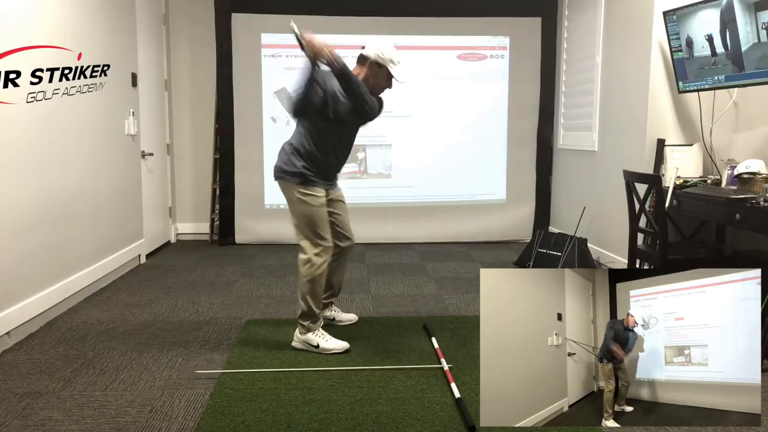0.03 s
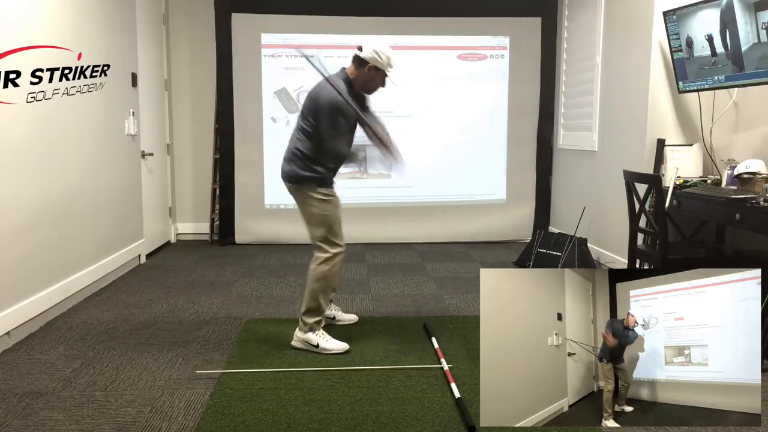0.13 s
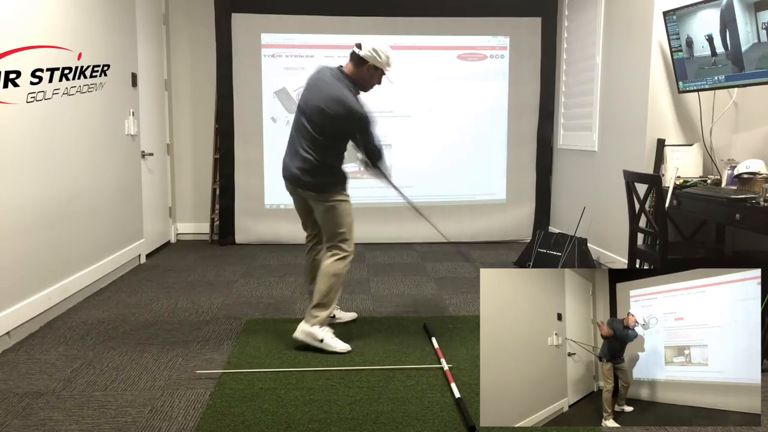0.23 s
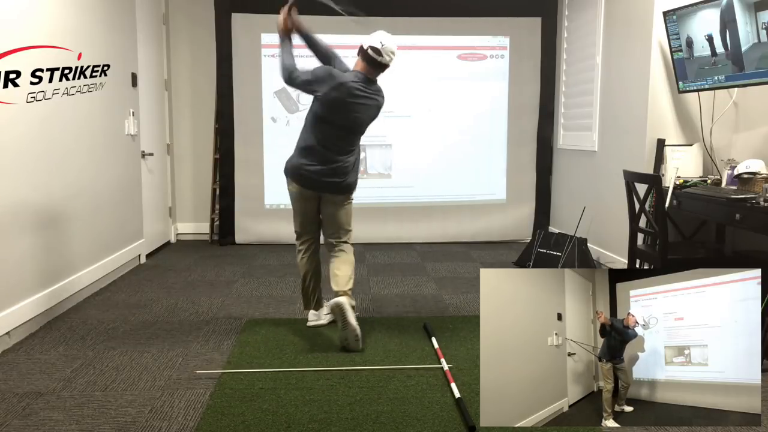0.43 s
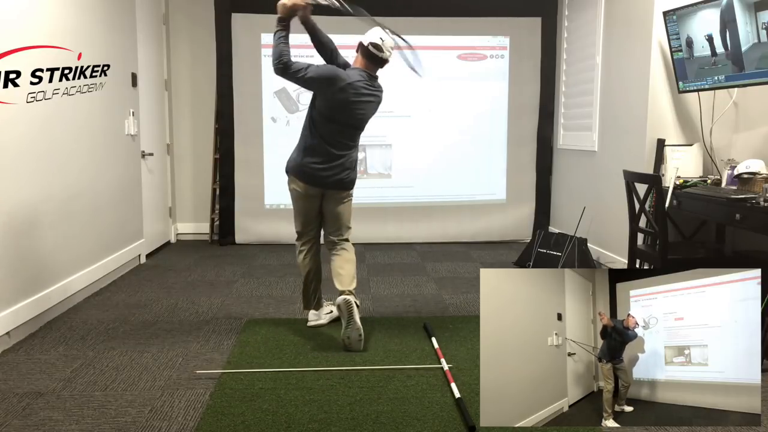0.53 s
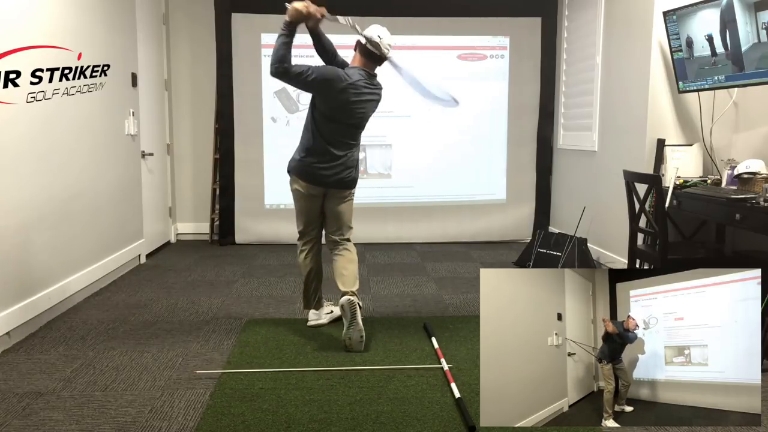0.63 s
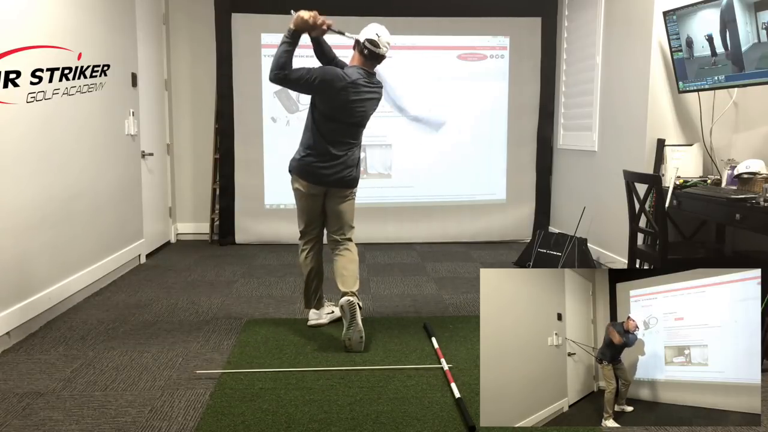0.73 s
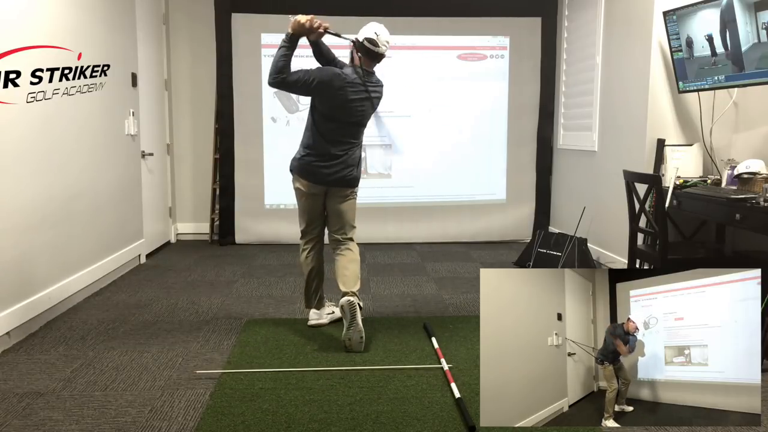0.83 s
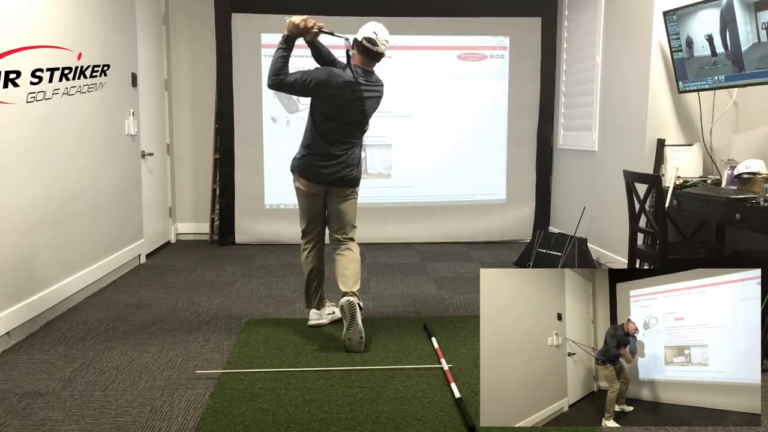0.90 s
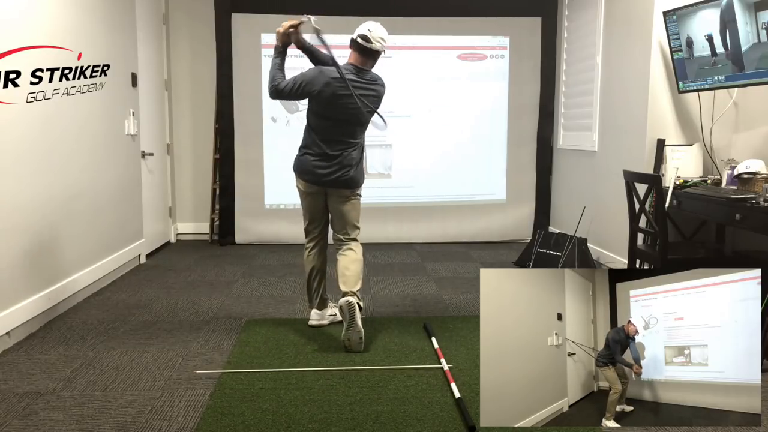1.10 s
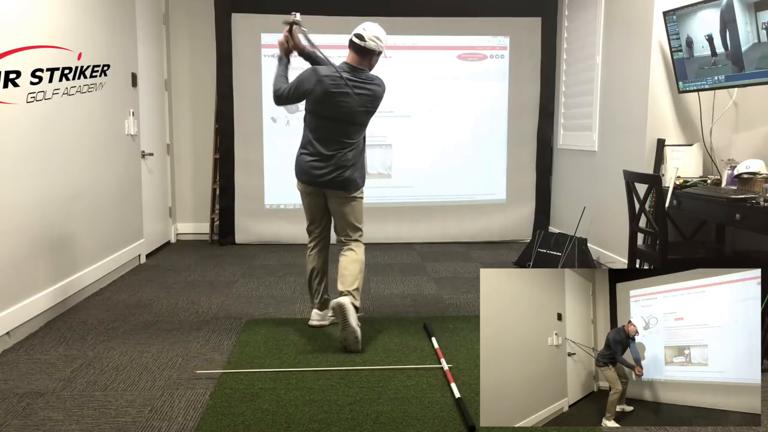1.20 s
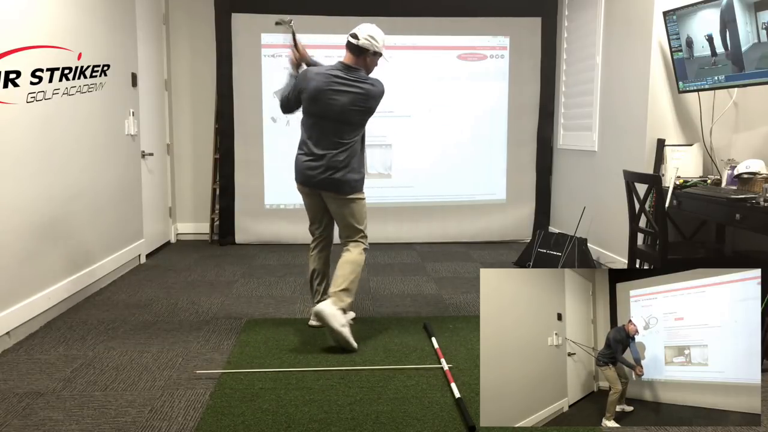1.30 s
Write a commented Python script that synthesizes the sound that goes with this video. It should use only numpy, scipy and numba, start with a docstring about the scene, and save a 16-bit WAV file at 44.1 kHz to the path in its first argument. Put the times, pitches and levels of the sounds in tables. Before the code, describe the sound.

After a small low thud and tick, one swift hollow whoosh of a swung rubber band swells, hits a distorted thump and drops away, leaving a short room ring, soft clothing rustle and light clicks in a garage.

```python
"""Rubber band swung in a garage

One full swing of a rubber band on a grip. Vortices shed off the band sing a tone that rises and falls with
its speed, with an octave and a hiss of turbulence; low thuds sound too, and one in mid-swing overloads the
microphone. Hard walls answer the swing, the thuds and small ticks with decaying diffuse noise. Grains of
cloth rustle, room tone and a low rumble lie beneath."""
import sys
import numpy as np
from scipy import signal
from scipy.fft import rfft, irfft, next_fast_len
from scipy.io import wavfile
from scipy.ndimage import uniform_filter1d
from numba import njit

SR = 44100
rng = np.random.default_rng(int(sys.argv[2]) if len(sys.argv) > 2 else 0)


def dump_mix(stems):
    """Bounce the given channels to the path in sys.argv[1] as a 16-bit WAV at rate SR."""
    frames = np.atleast_2d(stems).T  # one column per channel
    limited = np.clip(frames, -1, 1)  # hard clip at full scale
    pcm = np.round(limited * 32767).astype(np.int16)
    wavfile.write(sys.argv[1], SR, pcm)


N = 59535
T = np.arange(N) / SR  # time of each sample, s


def undb(db):
    """Amplitude ratio: 20 dB is a factor of ten."""
    return 10 ** (np.asarray(db) / 20)


def unit(x):
    """Normalisation to an rms of 1."""
    return x / np.sqrt(np.mean(x ** 2))


def curve(rows, axis):
    """Linear interpolation: one column of a time table, per sample."""
    rows = np.array(rows)
    return np.interp(T, rows[:, 0], rows[:, axis])


def colour(x, points):
    """Spectral shaping: weight x by a (Hz, dB) spectrum; rms 1."""
    hz, db = np.array(points).T
    f = np.maximum(np.fft.rfftfreq(len(x), 1 / SR), 1)
    gain_db = np.interp(np.log(f), np.log(hz), db)
    gain_db -= 20 * np.maximum(np.log2(hz[0] / f), 0)  # 20 dB per octave below the first point
    return unit(irfft(rfft(x) * undb(gain_db), len(x)))


def walk(rate):
    """Slow random modulation: noise averaged twice over 1 / rate seconds; rms 1."""
    width = max(int(SR / rate), 1)
    once = uniform_filter1d(rng.standard_normal(N), width)
    return unit(uniform_filter1d(once, width))


@njit
def svf(x, hz, share):
    """Resonance: a state-variable band-pass with a moving centre; share sets its width over its centre."""
    y, b, l = np.empty(len(x)), 0., 0.  # b, l: band-pass and low-pass states
    for i in range(len(x)):
        g = np.tan(np.pi * hz[i] / SR)
        v = (b + g * (x[i] - l)) / (1 + g * (g + share))
        b, l, y[i] = 2 * v - b, l + 2 * g * v, share * v
    return y


def whirr(hz, share):
    """Narrow-band noise: two cascaded resonances around a moving centre steepen the skirts; rms 1."""
    hz = np.minimum(hz * np.ones(N), .45 * SR)
    once = svf(rng.standard_normal(N), hz, 1. * share)
    return unit(svf(once, hz, 1. * share))


def band():
    """Aeolian tone: vortices shed at a rate set by the band's speed, with octave, spread and turbulence."""
    # Shedding pitch, following the band's speed. Each row: time in seconds, pitch in Hz.
    pitch = [(.165, 480), (.19, 545), (.207, 650), (.228, 810), (.248, 970), (.27, 900), (.29, 1010),
             (.302, 1110), (.312, 920), (.322, 700), (.335, 520), (.355, 470), (.6, 440)]
    # Swing. Each row: time in seconds, then levels in dB of tone, turbulence and fine treble hiss.
    swing_levels = [(.11, -61, -62, -73), (.165, -55, -54, -51), (.19, -22.5, -43, -54.5),
                    (.207, -11.5, -34, -44.5), (.228, -8, -22, -43.5), (.247, -7, -21, -37.5),
                    (.262, -23.5, -11.5, -32.5), (.285, -17, -11.5, -39), (.302, -15, -27, -39),
                    (.318, -8, -37, -63), (.335, -19.5, -24, -66), (.355, -19, -58.5, -68),
                    (.38, -41, -60, -74), (.43, -54, -27.5, -46), (.48, -60, -40, -66),
                    (.6, -65.5, -67, -71)]
    # Share of the band that sheds out of step. Each row: time in seconds, level in dB against the tone.
    spread_levels = [(.17, -3), (.2, -12), (.24, -6), (.29, -1), (.34, -6)]
    # Turbulence spectrum. Each row: frequency in Hz, relative level in dB per Hz.
    turbulence = [(710, 6.5), (1200, 5), (1570, 7), (1750, -2), (2430, -5.5), (3980, -15), (8600, -21.5),
                  (15500, -60)]
    pitch_wobble, level_wobble_db, wobble_per_s = .05, 4, 150  # rms share of pitch, rms dB, rate
    octave_db, treble_hz = -16, 8500  # octave against the tone; centre of the treble hiss

    hz = curve(pitch, axis=1)
    wavering_hz = hz * (1 + pitch_wobble * walk(wobble_per_s))
    phase = 2 * np.pi * np.cumsum(wavering_hz) / SR
    tone = np.sqrt(2) * undb(level_wobble_db * walk(wobble_per_s)) * np.sin(phase)
    octave = undb(octave_db) * whirr(2 * hz, .35)
    spread = undb(curve(spread_levels, axis=1)) * whirr(hz, .6)
    hiss = colour(rng.standard_normal(N), turbulence) * undb(1.5 * walk(40))
    treble = whirr(treble_hz, 0.73)
    return (undb(curve(swing_levels, axis=1)) * (tone + octave + spread)
            + undb(curve(swing_levels, axis=2)) * hiss
            + undb(curve(swing_levels, axis=3)) * treble)


def thuds():
    """Damped oscillation: each thud is a low sine whose pitch sags as it dies, with noisy grit on it."""
    # Each row: start in seconds, nominal peak in dB, first and last pitch in Hz, seconds to fall 20 dB.
    thud_rows = [(.0028, -25, 520, 150, .02), (.0203, -15, 500, 85, .016), (.2568, 6, 440, 118, .021),
                 (.280, -9, 200, 95, .032), (.55, -36, 160, 70, .03), (.764, -34, 400, 100, .012),
                 (.8853, -29, 560, 150, .007), (.902, -31, 560, 150, .007)]
    sag_s, rise_s = .0022, .002  # time constants of the pitch sag and of the onset
    grit = undb(-9.5) * whirr(362, 0.87)
    out = np.zeros(N)
    for s, db, first_hz, last_hz, fade_s in thud_rows:
        t = np.maximum(T - s, 0)
        turns = last_hz * t + (first_hz - last_hz) * sag_s * (1 - np.exp(-t / sag_s))
        level = undb(db - 20 * (t / fade_s) ** 2) * (1 - np.exp(-t / rise_s))  # fades ever faster
        out -= level * (np.sin(2 * np.pi * turns) + grit)
    return out


def ticks():
    """Impulsive excitation: a dying burst of noise also rattles the modes of a small hard part."""
    # Each row: start in seconds, nominal peak in dB, centre in Hz, T60 in seconds, ring level in dB.
    tick_rows = [(0.0201, -33.5, 2120, 0.12, -77), (.0453, -18, 9500, .006, -80),
                 (.8517, -28, 7000, .012, -50), (.872, -46, 8800, .008, -80),
                 (0.9457, -38, 7950, 0.0073, -80), (0.9508, -36, 8900, 0.005, -93),
                 (.965, -55.5, 3200, 0.16, -83), (0.9842, -34.5, 4900, 0.006, -76),
                 (1.338, -46, 3180, 0.017, -80)]
    # Modes of the hard part. Each row: centre in Hz, relative level in dB, T60 in seconds, width share.
    ring_rows = [(4312, 1, .09, .05), (5179, -1, .09, .03), (8500, -5, .15, .12)]
    modes = [whirr(hz, share) for hz, _, _, share in ring_rows]
    out = np.zeros(N)
    for s, db, hz, t60, ring_db in tick_rows:
        t = np.maximum(T - s, 0)
        ring = sum(undb(row[1] - 60 * t / row[2]) * mode for row, mode in zip(ring_rows, modes))
        burst = undb(db - 60 * t / t60) * whirr(hz, 1.2) / 2  # halved: peaks stand well above the rms
        out += (T >= s) * (burst + undb(ring_db) * ring)
    return out


def garage(x):
    """Diffuse reverberation: quarter-octave noise bands, each dying at its own rate.

    The band moves through the room, so every stretch of its path has an echo pattern of its own."""
    # Each row: frequency in Hz, T60 in seconds, relative echo level in dB.
    hz, t60, db = np.array([(100, 0.17, 20.5), (394, 0.68, -3), (494, 0.76, 4.5), (710, 0.95, 0.5),
                            (1030, 0.86, 1), (1177, 0.88, -1.5), (1550, 0.69, 1.5), (2880, 0.58, 3.5),
                            (8170, 0.55, -4.5), (15000, .3, 7.5)]).T
    first_echo_s, build_s = 0.014, 0.0078  # start of the decay; time constant of the build-up
    from_s, to_s, place_s = .17, .41, .012  # the band moves between these times; time per place

    t = np.maximum(T - first_echo_s, 0)
    f = np.maximum(np.fft.rfftfreq(N, 1 / SR), 1)
    mids = 45 * 2 ** np.arange(0, 8.5, .25)[:, None]  # band centres, Hz
    at = lambda column: np.interp(np.log(mids), np.log(hz), column)
    shapes = np.cos(np.pi * np.clip(2 * np.log2(f / mids), -.5, .5)) ** 2
    noise = irfft(rfft(rng.standard_normal(N)) * shapes, N)
    bands = np.tile(noise, 2).astype(np.float32)  # twice round, so that a pattern may start anywhere
    fades = (undb(at(db) - 60 * t / at(t60)) * (1 - np.exp(-t / build_s))).astype(np.float32)

    place = np.clip((T - from_s) / place_s, 0, round((to_s - from_s) / place_s))
    size, out = next_fast_len(2 * N), 0
    for k, start in enumerate(rng.integers(0, N, int(place[-1]) + 1)):
        tail = np.einsum("bn,bn->n", bands[:, start:start + N], fades)
        tail = tail / np.sqrt(np.sum(tail ** 2))  # unit energy
        here = x * np.cos(np.pi / 2 * np.clip(place - k, -1, 1))  # crossfade between places
        out = out + rfft(here, size) * rfft(tail, size)
    return irfft(out, size)[:N]


def rustle():
    """Granular friction: dense cloth grains of uneven size, in soft clumps."""
    # Each row: time in seconds, level in dB.
    rustle_levels = [(0, -63), (.02, -79), (.035, -48), (.06, -42.5), (.12, -50.5), (.19, -50.5), (.3, -45),
                     (.65, -54), (.73, -49.5), (.8, -64.5), (.9, -58.5), (.945, -50), (.99, -50.5),
                     (1.02, -58.5), (1.2, -57), (1.24, -51.5), (1.3, -49), (1.35, -48.5)]
    # Cloth spectrum. Each row: frequency in Hz, relative level in dB per Hz.
    rustle_colour = [(180, -32), (300, 4), (484, -13.5), (892, 4.5), (1390, -5.5), (2520, -4.5),
                     (8990, -14.5), (15500, -28)]
    grains_per_s, grain_spread_db = 12000, 1.8  # spread: mean of the exponential grain sizes
    hit = rng.random(N) < grains_per_s / SR
    size = rng.exponential(size=N)
    grains = hit * undb(grain_spread_db * size) * rng.standard_normal(N)
    return colour(grains, rustle_colour) * undb(curve(rustle_levels, axis=1) + 1.43 * walk(100))


def background():
    """Stationary and modulated noise: steady room tone and a low rumble that comes in lumps."""
    # Room-tone spectrum. Each row: frequency in Hz, relative level in dB per Hz.
    room_tone = [(12, -68), (20, -6), (112, 3), (245, -1), (342, -7.5), (649, -4.5), (1450, -13),
                 (1580, -14.5), (2920, -16.5), (15500, -54)]
    # Low rumble while the body turns. Each row: time in seconds, level in dB.
    rumble_levels = [(0, -55), (.1, -39), (.2, -35), (.35, -33.5), (.5, -37), (.7, -51), (1.0, -74),
                     (1.35, -63)]
    room_tone_db, rumble_hz = -53, 90.
    rumble = unit(svf(rng.standard_normal(N), np.full(N, rumble_hz), 2.0))
    lumpy = rumble * undb(5.2 * walk(36))
    tone = colour(rng.standard_normal(N), room_tone) * undb(room_tone_db)
    return tone + lumpy * undb(curve(rumble_levels, axis=1))


def scene():
    """Superposition: direct sounds, their reverberation and the background."""
    thud_room_db, tick_room_db, garage_db = -34.5, -25.5, -4.5  # sends to the room; its return
    swing, lows, small = band(), thuds(), ticks()
    wet = garage(swing + undb(thud_room_db) * lows + undb(tick_room_db) * small)
    return (swing + lows + small + undb(garage_db) * wet + rustle() + background())[None]


def record(dry):
    """Saturation and band limiting: peaks flatten near full scale, then the top is cut."""
    ceiling, knee, top_hz = 1.04, 6.0, 15900  # amplitude limit, sharpness of its bend, cutoff in Hz
    flat = dry / (1 + np.abs(dry / ceiling) ** knee) ** (1 / knee)
    low_pass = signal.ellip(10, .2, 70, top_hz, fs=SR, output="sos")
    return signal.sosfilt(low_pass, flat)


dry = scene()
out = record(dry)
dump_mix(out)
```